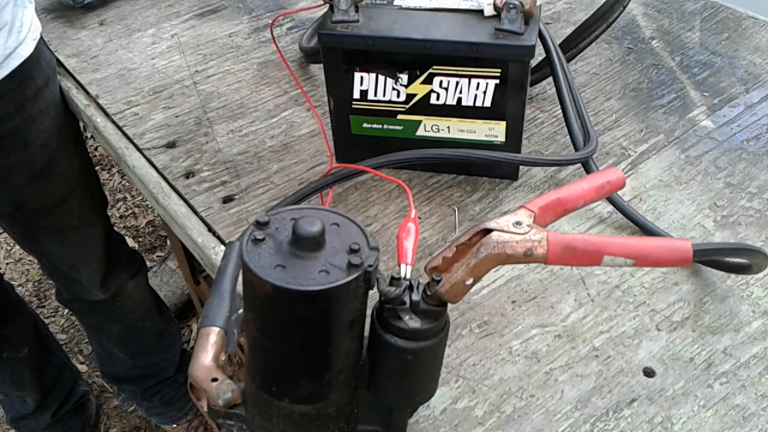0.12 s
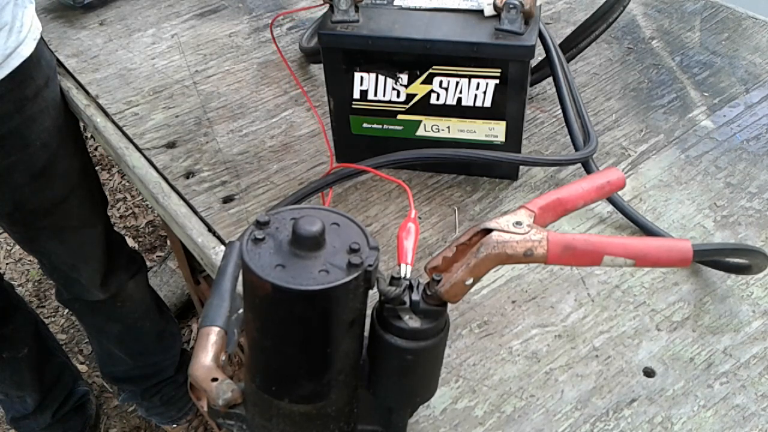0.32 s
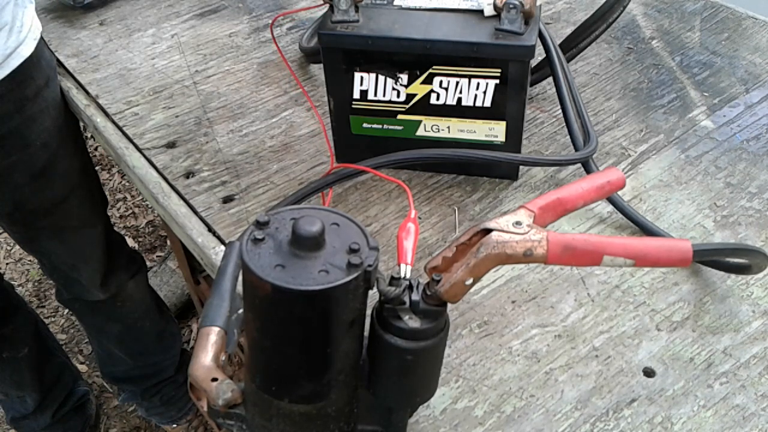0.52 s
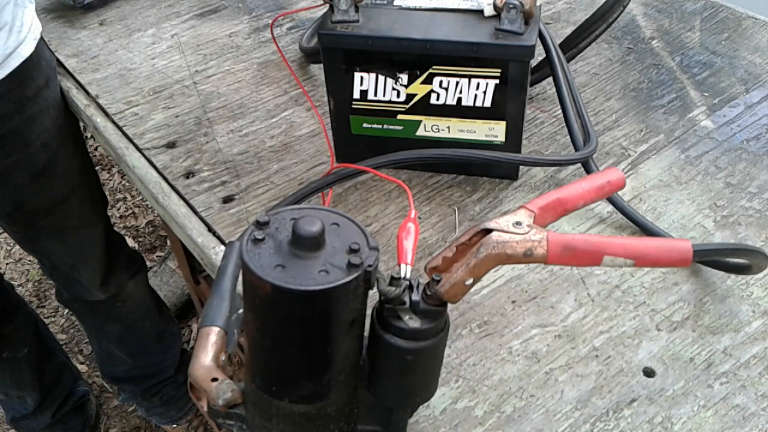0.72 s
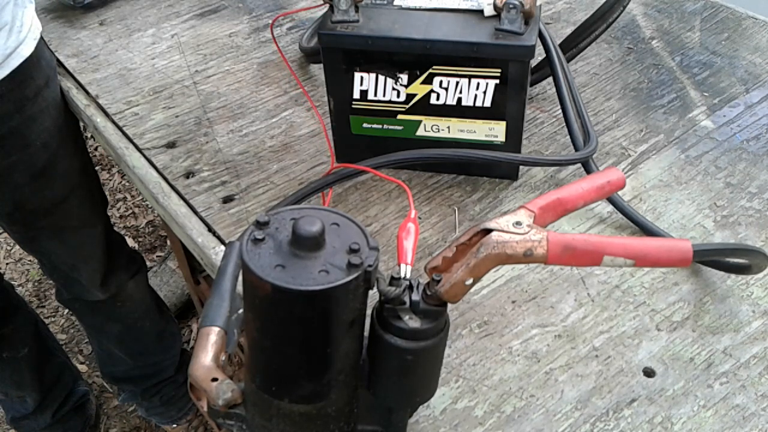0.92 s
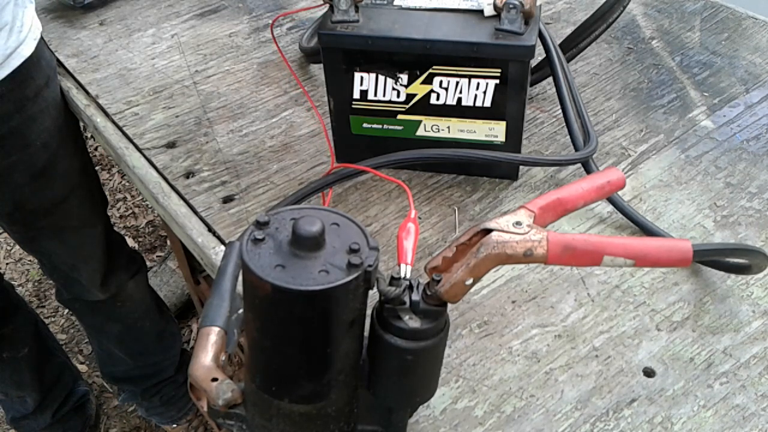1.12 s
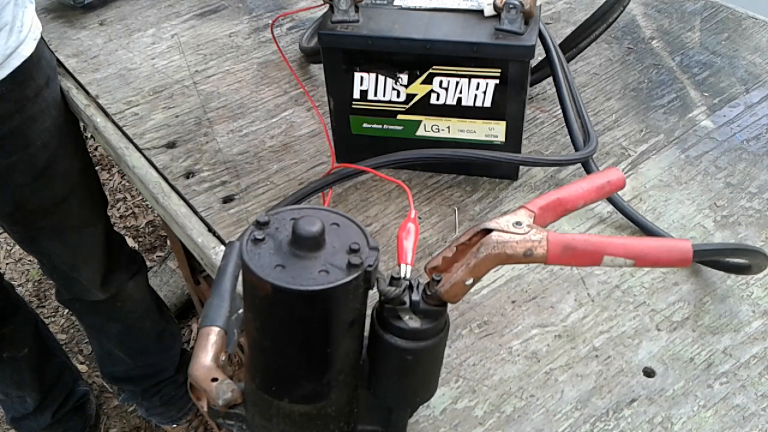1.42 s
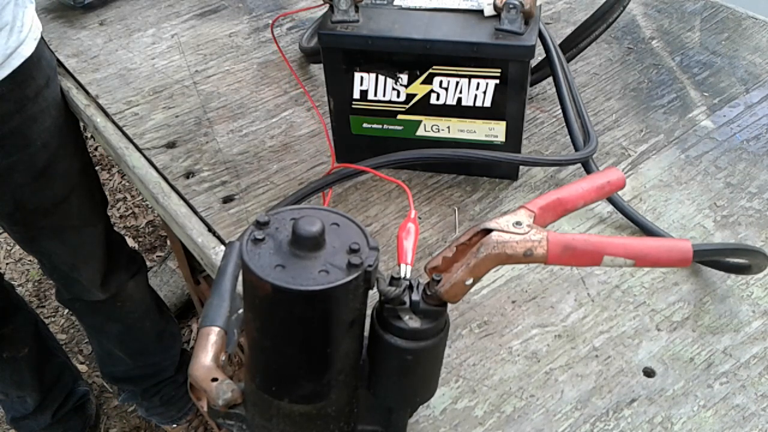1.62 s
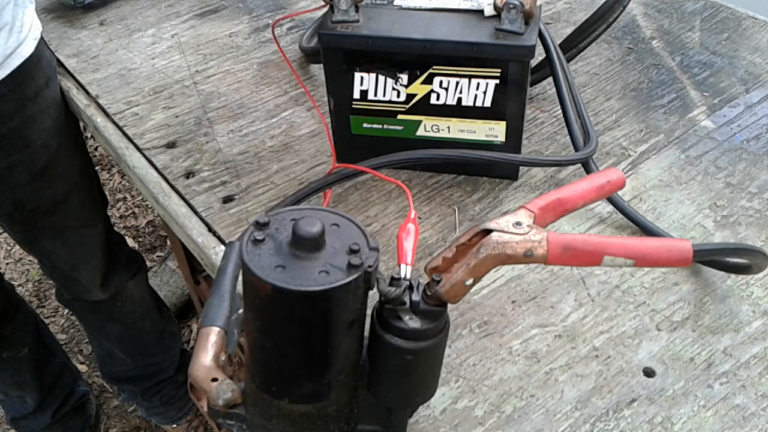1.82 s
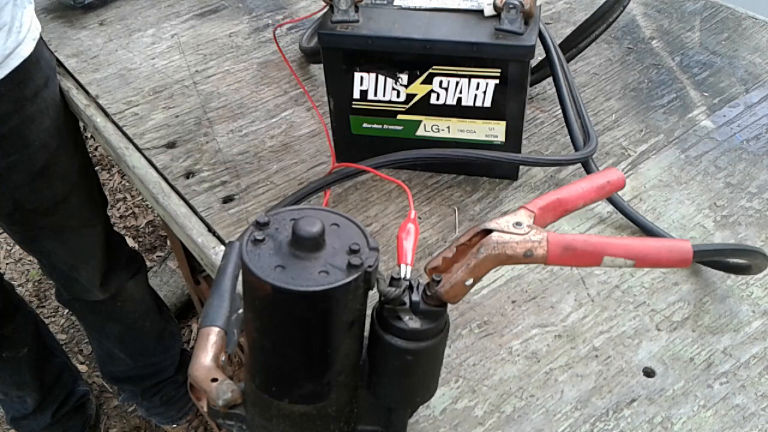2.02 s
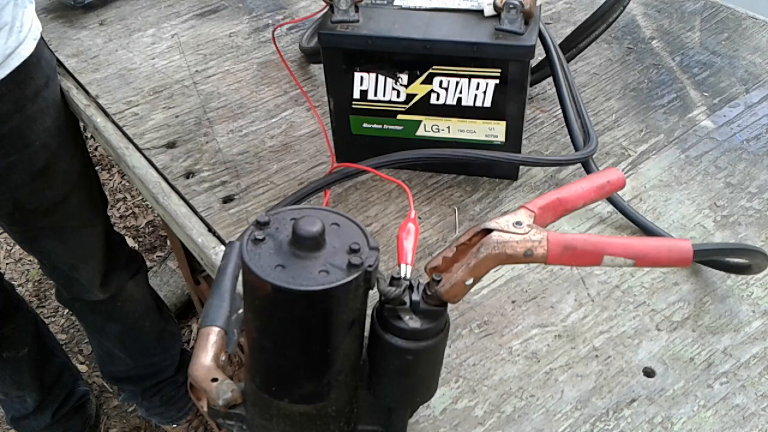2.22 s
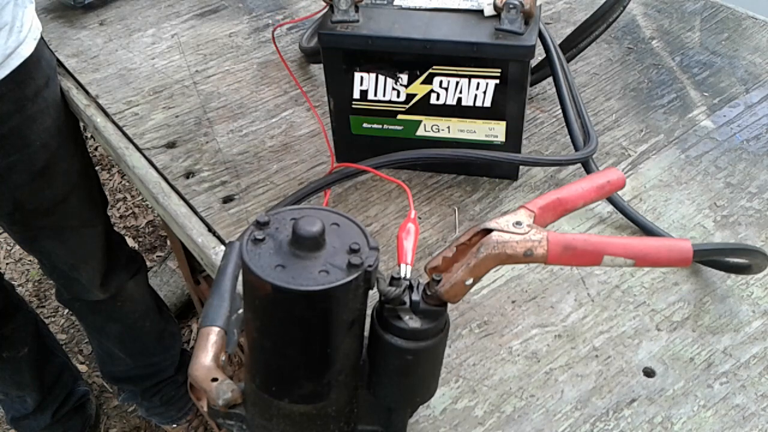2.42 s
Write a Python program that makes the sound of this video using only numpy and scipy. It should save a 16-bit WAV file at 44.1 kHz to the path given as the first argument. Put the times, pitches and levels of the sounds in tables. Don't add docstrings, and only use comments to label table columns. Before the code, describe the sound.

Hard metallic solenoid clack, a rattly electric motor spinning up fast, second clack, whirring run-down

```python
import sys
import numpy as np
from scipy import signal
from scipy.fft import rfft, irfft
from scipy.io import wavfile
from scipy.ndimage import uniform_filter1d

SR = 44100
rng = np.random.default_rng(int(sys.argv[2]) if len(sys.argv) > 2 else 0)


def log_audio(samples):
    frames = np.atleast_2d(samples).T
    limited = np.clip(frames, -1, 1)
    pcm = np.round(limited * 32767).astype(np.int16)
    wavfile.write(sys.argv[1], SR, pcm)


def elevation(decibels):
    levels = np.asarray(decibels, float)
    return 10 ** (levels / 20)


N = 114660
BARS = 28
EDGE_HZ = 15950

# frequency in Hz, shared share 0-1.
ALIKE = [(60, .995), (300, .98), (600, .82), (1400, .88), (2800, .8), (5000, .55), (9000, .5), (15000, .6)]


def evened(x):
    return x / np.sqrt(np.mean(x ** 2) + 1e-20)


def read(points, hz):
    f, value = np.transpose(points)
    return np.interp(np.log(hz + 1), np.log(f + 1), value)


def add(mix, start_s, sound):
    part = mix[round(start_s * SR):][:len(sound)]
    part += sound[:len(part)]


def wander(seconds):
    width = max(int(seconds * SR), 2)
    smooth = uniform_filter1d(rng.standard_normal(N), width)
    return evened(uniform_filter1d(smooth, width))


def coloured(x, db, size=2048):
    log = np.log(elevation(np.r_[db, db[-2:0:-1]]))
    taps = np.fft.ifft(np.exp(np.conj(signal.hilbert(log)))).real
    return signal.oaconvolve(x, taps)[:len(x)]


def ring(hz, t60, t):
    return elevation(-60 * t / t60) * np.sin(2 * np.pi * hz * t)


def yard():
    # frequency in Hz, level in dB.
    wash_db = [(30, -12), (70, -5), (150, -5.5), (600, -12.5), (2500, -21), (5000, -35.5), (9000, -42.5),
               (16000, -36)]
    level_db = -51.5
    hz = np.fft.rfftfreq(N, 1 / SR)
    a, b = rfft(rng.standard_normal((2, N)) * elevation(0.79 * wander(0.0097)))
    same = np.clip(read(ALIKE, hz) - .1, 0, 1)
    pair = np.array([a, same * a + np.sqrt(1 - same ** 2) * b])
    return elevation(level_db) * evened(irfft(pair * elevation(read(wash_db, hz)), N))


def bench_thuds():
    # start in seconds, peak in dB, mode in Hz, t60 in seconds, push +1 or pull -1.
    thuds = [(.052, -44, 130, .05, 1), (.2475, -18, 118, .09, 1), (.2532, -7, 260, .012, -1),
             (.2745, -25, 210, .1, 1), (.2605, -19, 260, .04, -1), (.2425, -22, 480, .03, 1),
             (.268, -24, 600, .04, 1), (1.7785, -11, 135, .075, 1), (1.7745, -17, 300, .03, -1),
             (1.8105, -15, 125, .025, 1), (1.7855, -18, 600, .03, 1)]
    out, t = np.zeros(N), np.arange(6000) / SR
    for s, db, f, t60, sign in thuds:
        add(out, s, sign * elevation(db) * np.minimum(t / .0006, 1) * ring(f, t60, t))
    return out


def metal_snaps():
    # start in seconds, peak in dB.
    snaps = [
        (.2387, -12),
        (.2445, -21),
        (.2612, -24),
        (.2668, -33),
        (1.7725, -30),
        (1.7983, -19),
        (1.8012, -27),
        (1.8525, -32),
    ]
    # frequency in Hz, level in dB.
    snap_db = [(300, -16), (2000, 0), (6000, -7), (8500, 3.5), (11500, -1), (16000, -6)]
    t60_s = .004
    out, t, hz = np.zeros(N), np.arange(600) / SR, np.fft.rfftfreq(2048, 1 / SR)
    for s, db in snaps:
        grit = rng.standard_normal(len(t))
        grit[0] = 3
        snap = coloured(grit * elevation(-60 * t / t60_s), read(snap_db, hz))
        add(out, s, elevation(db) * snap / abs(snap).max())
    return out


def solenoid_knocks():
    # start in seconds, peak in dB, main ring in Hz, ring t60 in seconds,
    # crack and casing in dB re the ring.
    knocks = [(.2168, -42, 3840, .01, -6), (.223, -34, 1800, .008, 0), (.2277, -22, 3900, .015, -8),
              (.2289, -14, 3950, .016, -10), (.231, -20, 1330, .01, -5), (.2386, -4, 1980, .011, -7),
              (.2432, -6, 1850, .014, -11), (.2475, -17, 1150, .015, -6), (.2505, -20, 2200, .012, -4),
              (.2597, -17, 1800, .012, -2), (.2665, -24, 1150, .02, -4), (.272, -25, 1900, .015, -8),
              (1.4481, -17, 2160, .0069, -30), (1.773, -8, 2000, .014, -12), (1.7768, -15, 2300, .01, -6),
              (1.7805, -15, 3900, .014, -6), (1.785, -14, 2300, .025, -6), (1.7885, -11, 1000, .014, -11),
              (1.798, -1.5, 2100, .009, -13), (1.8, -11, 950, .018, -10), (1.8115, -16, 2310, .025, -4),
              (1.8265, -18, 3900, .02, -6), (1.8297, -5, 1900, .013, -18), (1.8335, -18, 1100, .02, -8),
              (1.852, -21.5, 3840, .015, -6), (1.87, -22, 2170, .03, -14)]
    # frequency in Hz, level in dB, t60 in seconds.
    steel = [(1040, -10, .03), (1740, -10, .04), (2300, -10, .03), (3130, -10, .025), (3500, -10, .025),
             (4050, -13, .025), (6110, -12, .025), (9000, -26, .01)]
    # frequency in Hz, level in dB.
    crack_curve = [(100, 5.5), (800, 11), (2800, 5.5), (4000, 2.5), (6200, -2), (8000, -10.5),
                   (10000, -22.5), (16000, -14)]
    out, t, hz = np.zeros(N), np.arange(6000) / SR, np.fft.rfftfreq(2048, 1 / SR)
    crack_decay = elevation(-60 * t / 0.013) + elevation(-18.0 - 60 * t / 0.073)
    luck = rng.standard_normal((len(knocks), len(steel)))
    for (s, db, main_hz, t60, crack_db), odds in zip(knocks, luck):
        crack = evened(coloured(rng.standard_normal(len(t)), read(crack_curve, hz))) * crack_decay
        casing = sum(elevation(d + 3.0 * o) * ring(f * (1 + .02 * o), w, t) for (f, d, w), o in zip(steel, odds))
        main = ring(main_hz, t60, t) + 0.11 * ring(main_hz * 0.92, t60, t)
        main = np.minimum(t / 0.00068, 1) * main
        add(out, s, elevation(db) * (main + elevation(crack_db) * np.minimum(t / .0003, 1) * (crack + casing)))
    return out


def armature_spin():
    # time in seconds, commutator whine in Hz.
    speed = [(.24, 300), (.30, 1250), (.37, 2140), (.42, 2680), (.46, 3040), (.52, 3490), (.58, 3870),
             (.66, 4275), (.78, 4780), (.9, 5175), (1.05, 5505), (1.2, 5805), (1.5, 6160), (1.79, 6345),
             (1.9, 5670), (2.1, 4674), (2.3, 3785), (2.45, 3140), (2.6, 2550)]
    whine_hz = uniform_filter1d(np.interp(np.arange(N) / SR, *np.transpose(speed)), size=2000)
    return whine_hz, np.cumsum(whine_hz) / SR / BARS


def brush_rattle(whine_hz, turns):
    # time in seconds, level in dB.
    effort = [(.25, -32), (.32, -38.5), (.4, -33), (.5, -30.5), (.62, -28.5), (.76, -32.5), (1.0, -31.5),
              (1.3, -30.5), (1.45, -28), (1.75, -27), (1.9, -27), (2.1, -30), (2.2, -31.5), (2.4, -34.5),
              (2.6, -36)]
    # frequency in Hz, level in dB.
    slow = [(24, -71), (40, -15), (130, -10.5), (194, -3), (269, -3.5), (312, -5.5), (1440, -8.5),
            (3830, -12), (16000, -50.5)]
    # frequency in Hz, level in dB.
    fast = [(24, -83), (40, -26), (137, -2), (185, -11), (215, -5.5), (585, -6.5), (646, -7), (3930, -11),
            (16000, -46.5)]
    # frequency in Hz, width in Hz, lift in dB.
    housing = [(454, 51, 6.5), (578.5, 118, 7.5), (944, 83, 3), (1124, 25, 6.5), (1750, 36, 2.5),
               (2072, 18, 5), (2310, 770, 5.5), (2480, 200, 2), (3900, 300, 6), (4600, 33, 6),
               (6145, 530, 7.5)]
    # frequency in Hz, width in Hz, lift in dB.
    dips = [(207.7, 18.8, -27), (629, 17, -9), (1435, 162, -5.5), (3260, 100, -2.5), (9000, 13000, -0.5),
            (14900, 2200, 10.5)]
    t, hz = np.arange(N) / SR, np.fft.rfftfreq(2048, 1 / SR)

    tick_size = elevation(0.87 * np.minimum(rng.exponential(1, N), 5))
    tick_now = rng.random(N) < 2000 / SR
    ticks = tick_size * tick_now * rng.choice([-1, 1], (2, N))
    scores = np.diff(rng.standard_normal((2, 241)))
    angle = np.linspace(0, 1, scores.shape[1])
    lap = np.array([np.interp(turns % 1, angle, row) for row in scores])
    throb_db = 2.0 * np.cos(2 * np.pi * turns + .6 * wander(.02)) + 1.5 * wander(.004) + .7 * wander(.012)
    drive = elevation(throb_db) * (rng.standard_normal((2, N)) + .5 * evened(ticks) + .5 * lap)

    body_db = sum(db / (1 + (2 * (hz - f) / w) ** 2) for f, w, db in housing + dips)
    slow_hum = evened(np.array([coloured(row, read(slow, hz) + body_db) for row in drive]))
    fast_hum = evened(np.array([coloured(row, read(fast, hz) + body_db) for row in drive]))
    share = np.clip((whine_hz - 3500) / 2600, 0, 1)
    hum = (1 - share) * slow_hum + share * fast_hum
    return hum * elevation(np.interp(t, *np.transpose(effort))) * np.clip((t - .236) / 0.0034, 0, 1)


def commutator_whine(whine_hz, turns):
    # time in seconds, level in dB.
    whine_curve = [(.345, -56), (.385, -42), (.428, -33), (.475, -39), (.52, -54), (.57, -35), (.645, -54),
                   (.85, -70), (1.15, -52), (1.27, -55), (1.36, -72), (1.83, -70), (1.9, -54), (2.0, -57),
                   (2.13, -49), (2.195, -66), (2.27, -45), (2.44, -46), (2.49, -56), (2.55, -39),
                   (2.6, -52)]
    # frequency in Hz, level in dB.
    shaft_curve = [(60, -75), (95, -53), (122, -47), (150, -48), (175, -58), (203, -62), (214, -49),
                   (225, -40), (290, -42), (450, -42)]
    # frequency in Hz, level in dB.
    overtone = [(5000, -86), (6500, -81), (8200, -77), (9500, -86), (11000, -86), (12300, -80),
                (14000, -83), (16000, -90)]
    t, turn_hz, phase = np.arange(N) / SR, whine_hz / BARS, 2 * np.pi * turns

    whine = np.sin(BARS * phase + 0.23 * wander(0.012))
    whine += elevation(-11) * np.sin((BARS - 1) * phase) + elevation(-15) * np.sin((BARS + 1) * phase)
    tone = whine * elevation(np.interp(t, *np.transpose(whine_curve)) + 1.2 * wander(0.015))
    for k, db in ((1, 0), (2, -9)):
        tone += elevation(read(shaft_curve, k * turn_hz) + db + 1.6 * wander(.025)) * np.sin(k * phase)
    for k in (2 * BARS - 2, 2 * BARS - 1, 2 * BARS, 3 * BARS):
        level = elevation(read(overtone, k * turn_hz) + 4.0 * wander(.03))
        tone += level * (k * turn_hz < EDGE_HZ) * np.sin(k * phase)
    return np.sqrt(2) * (t > .28) * tone


def ports(x, scattered):
    # frequency in Hz, left minus right in dB.
    lean_curve = [(60, 0), (200, -2), (700, 1.5), (2300, -2.5), (3200, 7), (4400, 12), (8100, 7.5),
                  (15000, 3)]
    # frequency in Hz, right lag in radians.
    lag_curve = [(60, .1), (860, .2), (1400, .5), (2500, 1.5), (2950, 2.2), (4050, 1.3), (5600, 3.0),
                 (16000, 9)]
    hz = np.fft.rfftfreq(N, 1 / SR)
    same, lean_db, z = np.clip(read(ALIKE, hz), 0, 1), read(lean_curve, hz), rfft(x)
    right = same * z * np.exp(-1j * read(lag_curve, hz)) + np.sqrt(1 - same ** 2) * rfft(scattered)
    return np.array([irfft(z * elevation(lean_db / 2), N), irfft(right * elevation(-lean_db / 2), N)])


def scene():
    hits = bench_thuds() + metal_snaps() + solenoid_knocks()
    whine_hz, turns = armature_spin()
    motor = brush_rattle(whine_hz, turns) + commutator_whine(whine_hz, turns)
    late_hits = np.roll(hits, round(.0007 * SR))
    return yard() + ports(motor[0] + hits, motor[1] + late_hits)


def top_cut(x):
    return signal.sosfilt(signal.butter(12, 16830, fs=SR, output="sos"), x)


def record(dry):
    thin = signal.sosfilt(signal.butter(2, 75, "high", fs=SR, output="sos"), dry)
    edge = signal.firwin(301, EDGE_HZ, window=("kaiser", 8), fs=SR)
    return top_cut(signal.oaconvolve(thin, edge[None], "same"))


dry = scene()
out = record(dry)
log_audio(out)
```